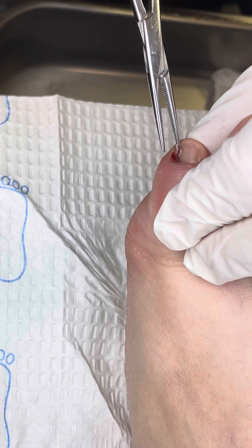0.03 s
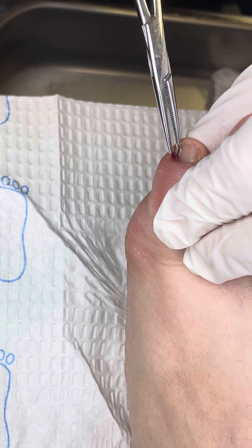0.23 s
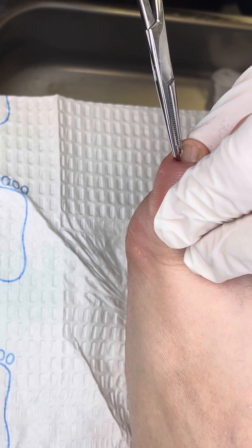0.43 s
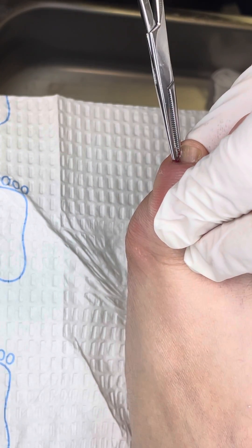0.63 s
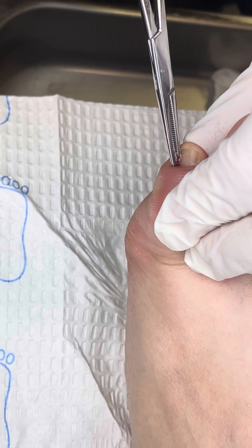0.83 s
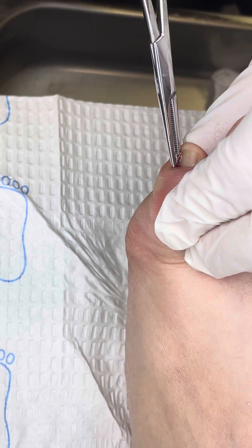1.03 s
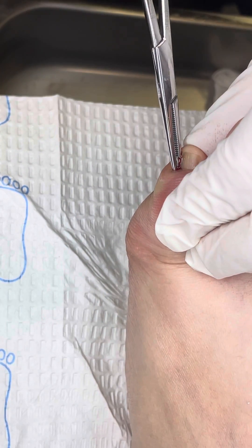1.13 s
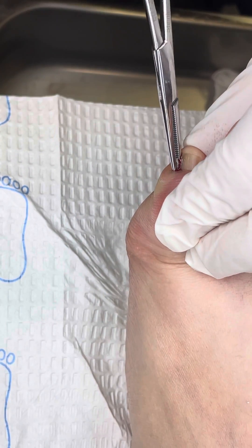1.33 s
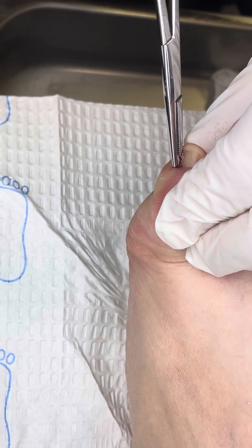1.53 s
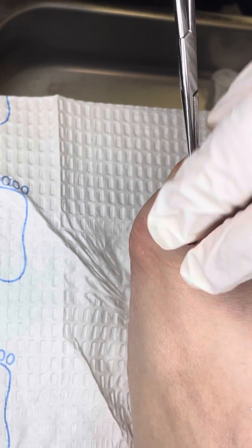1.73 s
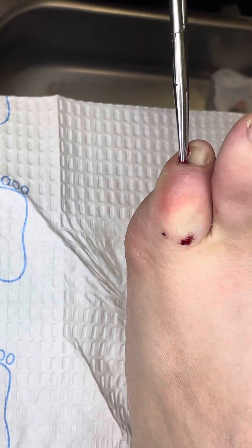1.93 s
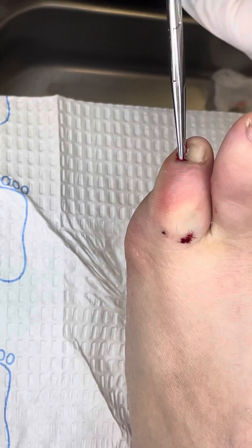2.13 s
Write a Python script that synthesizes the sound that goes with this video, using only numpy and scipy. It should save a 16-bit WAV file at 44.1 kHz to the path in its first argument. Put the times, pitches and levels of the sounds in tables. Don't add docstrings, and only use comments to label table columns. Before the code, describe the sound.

Two crisp metallic clicks of a surgical clamp, then faint latex glove ticks over low ventilation rumble.

```python
import sys
import numpy as np
from scipy import signal
from scipy.fft import rfft, irfft
from scipy.io import wavfile
from scipy.ndimage import uniform_filter1d

SR = 44100
rng = np.random.default_rng(int(sys.argv[2]) if len(sys.argv) > 2 else 0)


def pcm_store(signal):
    levels = np.round(np.clip(np.atleast_2d(signal), -1, 1) * 32767)
    wavfile.write(sys.argv[1], SR, levels.astype(np.int16).T)


def attenuation_scalar(level_db):
    decades = np.asarray(level_db, float) / 20
    return 10 ** decades


N = 96138

# start_s, level_db, tooth_index, rebound_gap_ms
TOOTH_SNAPS = [
    (1.5466, -35.4, 0, .95),
    (1.6069, -35.6, 1, .95),
]
# start_s, level_db, tilt_db_per_octave
RATCHET_CREEP = [
    (1.4640, -78.5, 4.5),
    (1.5037, -82.5, -5),
    (1.5120, -89.5, -9),
    (1.5375, -87, -13),
]
# pitch_hz, swell_ms, first_tooth_db, second_tooth_db
STEEL_MODES = [(850, .35, -7, -3), (1880, .8, 2, 6), (2620, .95, 9.5, 15), (3350, .6, -1, 3),
               (4680, .8, 5, 13), (5200, .6, 2, 8), (6650, .45, -5, 10), (7650, .6, 8, 6), (8500, .3, 5, 5),
               (9650, .3, 10, 9.5), (12150, .5, 6, 11), (13300, .3, 8, 5), (14050, .3, 14, 16.5),
               (15300, .6, -3, 15)]
# delay_in_rebound_gaps, level_db
PAWL_REBOUNDS = [
    (0, 0),
    (1.3, -17),
    (2.6, -23),
    (4.1, -29),
]
# start_s, level_db, pitch_hz, width_hz, length_ms
GLOVE_TICKS = [(.160, -82, 5000, 1500, 2.4), (0.914, -80, 11500, 1190, 6.),
               (1.7278, -46.5, 11300, 7360, 0.88), (1.778, -57, 2720, 600, 3.8),
               (1.793, -63.5, 3040, 795, 6.1), (1.8353, -61.5, 7440, 2500, 3.2),
               (1.836, -61, 2600, 500, 1.54), (1.9312, -55, 4170, 1200, 3), (1.9324, -57, 2680, 700, 2),
               (2.0670, -74, 10900, 5000, 0.87), (2.0790, -66, 623.6, 343, 5.9),
               (1.463, -69.5, 3630, 700, 2.2)]
# time_s, pressure_db
GLOVE_PRESSURE = [(1.462, -105), (1.468, -87.5), (1.54, -79.5), (1.76, -64.5), (1.82, -76.5), (1.89, -69.5),
                  (1.972, -69), (1.982, -92), (2.04, -81.5), (2.13, -79), (2.165, -69)]
# pitch_hz, density_db_per_hz
LATEX_COLOUR = [(700, -7.5), (1500, -5.5), (2800, 3), (4000, -4.5), (6000, -3), (9500, -2.5), (13000, -6),
                (16000, -8)]
# pitch_hz, t60_s
ROOM_DECAY = [(300, 0.12), (1200, 0.49), (2500, 0.3), (5000, 0.35), (9000, 0.34), (15000, .22)]
# pitch_hz, level_db
ROOM_COLOUR = [(400, 12), (1200, 2), (2700, 4), (4800, -1), (6000, -2), (12000, -3), (15500, -7),
               (16000, -30)]
# pitch_hz, likeness_0_to_1
PORT_LIKENESS = [(110, 1), (300, .9), (550, .2), (1200, .2), (2100, .95), (6000, .97), (7000, .998),
                 (16000, .998)]
# pitch_hz, left_over_right_db
LEFT_LEAN = [(90, 0), (200, 1.5), (600, 4), (1100, 2.5), (1800, 3.5), (2600, 0)]
# middle_s, half_length_s, level_db, pitch_hz, width_hz
DRAPE_MOVES = [(0.687, .045, -73, 1670, 1170), (0.71, 0.082, -67, 600, 520), (1.036, 0.099, -54, 150, 195),
               (0.83, 0.13, -60, 166, 187), (0.971, 0.14, -72, 500, 1500)]
# pitch_hz, density_db_per_hz
AIR_COLOUR = [(50, -26.5), (85, -2.5), (97, -1.5), (241, -9.5), (389, -19), (465, -22.5), (524, -23),
              (696, -24), (3000, -52.5), (3900, -73.5), (6600, -120)]
# pitch_hz, density_db_per_hz
HISS_COLOUR = [(800, -8.5), (2000, 6), (3500, -4.5), (7000, -8), (12500, -14.5), (14000, -21)]
# time_s, level_db
DUCT_RUMBLE = [(0.0, -50.5), (0.13, -52), (0.39, -51.5), (0.41, -76), (0.44, -55), (0.65, -60), (0.81, -46),
               (1.2, -56.5), (1.24, -48.5), (1.29, -57), (1.39, -47.5), (1.75, -64), (1.82, -85),
               (1.85, -49.5), (2.0, -51.5), (2.18, -54.5)]
# pitch_hz, width_hz, level_db
DUCT_MODES = [(35.2, 36, -12), (55, 9, -1), (72.5, 12, -7.5)]
# pitch_hz, level_db
MAINS_HUM = [(120, -77.5), (160, -76), (240, -72.5), (360, -74)]
# pitch_hz, lead_radians
PORT_LEAD = [(300, 0), (900, -.55), (1650, -.4), (2600, 1), (4500, .7), (4950, 0), (5550, .3), (6700, 2.4)]


def evened(x):
    return x / np.sqrt(np.mean(x ** 2) + 1e-20)


def read(points, hz):
    f, value = np.transpose(points)
    return np.interp(np.log(hz + 1), np.log(f + 1), value)


def add(mix, start_s, sound):
    part = mix[round(start_s * SR):][:len(sound)]
    part += sound[:len(part)]


def resonate(x, hz, width_hz):
    turn = np.exp(2j * np.pi * hz * np.arange(x.shape[-1]) / SR)
    r = np.exp(-np.pi * width_hz / SR)
    smooth = signal.lfilter([(1 - r) ** 2], [1, -2 * r, r * r], x / turn)
    return 2 * (turn * smooth).real


def coloured(points, patchy_db, channels=2):
    hz = np.fft.rfftfreq(1024, 1 / SR)
    z = rng.standard_normal((N // 256 + 5, 513, 2 * channels + 1)).T
    patches = uniform_filter1d(z[-1], size=10, axis=0)
    patches = evened(uniform_filter1d(patches, size=10, axis=1))
    inside = (hz > .7 * points[0][0])[:, None]
    gain = inside * attenuation_scalar(read(points, hz)[:, None] + patchy_db * patches)
    z = (z[:channels] + 1j * z[channels:-1]) * gain
    return evened(signal.istft(z, nperseg=1024, noverlap=768)[1][:, :N])


def ring(levels_db, gap_ms, blur=1, crack_db=15):
    out, t = np.zeros(2000), np.arange(1200) / SR
    steel = np.array(STEEL_MODES)
    hz, swell_ms = steel[:, 0:1], steel[:, 1:2]
    u = t * 1000 / (swell_ms * blur)
    swell = u * np.exp(1 - u) / swell_ms
    for gaps, db in PAWL_REBOUNDS:
        turns = hz * t + (gaps > 0) * rng.random(hz.shape)
        modes = attenuation_scalar(db + levels_db[:, None]) * swell * np.sin(2 * np.pi * turns)
        add(out, gaps * gap_ms / 1000, modes.sum(0))
    u = t / .0007
    crack = signal.lfilter([1, -.5], 1, rng.standard_normal(1200))
    add(out, 0, attenuation_scalar(crack_db) * crack * np.sqrt(u) * np.exp(-2 * u))
    return out


def clamp():
    direct, walls, steel = np.zeros(N), np.zeros(N), np.array(STEEL_MODES)
    for start_s, db, tooth, gap_ms in TOOTH_SNAPS:
        levels_db = steel[:, 2 + tooth]
        add(direct, start_s, attenuation_scalar(db) * ring(levels_db, gap_ms))
        add(walls, start_s, attenuation_scalar(db) * ring(levels_db, gap_ms, blur=.45, crack_db=21))
    for start_s, db, tilt_db in RATCHET_CREEP:
        levels_db = steel[:, 2] + tilt_db * np.log2(steel[:, 0] / 5000)
        add(direct, start_s, attenuation_scalar(db) * ring(levels_db, gap_ms=.9))
    return direct, walls


def glove():
    t = np.arange(N) / SR
    grain = attenuation_scalar(1.5 * evened(uniform_filter1d(rng.standard_normal(N), size=60)))
    pressure = attenuation_scalar(np.interp(t, *np.transpose(GLOVE_PRESSURE), left=-140))
    out = pressure * grain * coloured(LATEX_COLOUR, patchy_db=0.83, channels=1)[0]
    for start_s, db, hz, width_hz, length_ms in GLOVE_TICKS:
        u = t[:2000] * 1000 / length_ms
        envelope = 2 * np.sqrt(u) * np.exp(-u * 1.07)
        tick = evened(resonate(rng.standard_normal(2000), hz, width_hz))
        add(out, start_s, attenuation_scalar(db) * envelope * tick)
    return out


def diffuse(pair):
    hz, (a, b) = np.fft.rfftfreq(N, 1 / SR), rfft(pair)
    same = np.clip(read(PORT_LIKENESS, hz), 0, 1)
    lean = attenuation_scalar(read(LEFT_LEAN, hz) / 2)
    right = same * a + np.sqrt(1 - same ** 2) * b
    return irfft([a * lean, right / lean], N)


def room(x):
    gap_s = 0.0024
    hz, t, z = signal.stft(rng.standard_normal((2, SR)), SR, nperseg=256)
    decay_db = 60 * t / read(ROOM_DECAY, hz)[:, None]
    z = z * attenuation_scalar(read(ROOM_COLOUR, hz)[:, None] - decay_db)
    onset = np.clip(np.arange(SR) / SR / gap_s - 1, 0, 1)
    tail = signal.istft(z, SR, nperseg=256)[1][:, :SR] * onset
    tail = tail / np.linalg.norm(tail[0])
    return diffuse(signal.fftconvolve(x[None], tail, axes=1)[:, :N])


def drape():
    t, out = np.arange(N) / SR, np.zeros((2, N))
    for middle_s, half_s, db, hz, width_hz in DRAPE_MOVES:
        swell = np.exp(-((t - middle_s) / half_s) ** 2)
        out += attenuation_scalar(db) * swell * evened(resonate(rng.standard_normal((2, N)), hz, width_hz))
    return out


def air_and_hiss():
    air = coloured(AIR_COLOUR + [(6000, -76.5)], patchy_db=0.61)
    return attenuation_scalar(-61) * air + attenuation_scalar(-83.5) * coloured(HISS_COLOUR, patchy_db=.6)


def duct_rumble():
    duct = np.zeros(N)
    for hz, width_hz, db in DUCT_MODES:
        mode = resonate(rng.standard_normal(2 * N), hz, width_hz)[N:]
        duct += attenuation_scalar(db) * evened(mode)
    duct = evened(duct)
    duct = duct / np.sqrt(uniform_filter1d(duct ** 2, size=6000) + 0.11)
    return attenuation_scalar(np.interp(np.arange(N) / SR, *np.transpose(DUCT_RUMBLE))) * duct


def mains_hum():
    t = np.arange(N) / SR
    return sum(attenuation_scalar(db + 0.5) * np.sin(2 * np.pi * (hz * t + rng.random())) for hz, db in MAINS_HUM)


def background():
    return diffuse(drape() + air_and_hiss()) + duct_rumble() + mains_hum()


def scene():
    (direct, walls), hand = clamp(), glove()
    return direct + hand + attenuation_scalar(-11.5) * room(walls + hand) + background()


def band_limit(x):
    return signal.sosfilt(signal.butter(12, 17170, fs=SR, output="sos"), x)


def record(dry):
    edge_hz, lead_per_hz = 15900, .000935
    hz = np.fft.rfftfreq(N, 1 / SR)
    lead = np.interp(hz, *np.transpose(PORT_LEAD))
    lead = lead + lead_per_hz * np.maximum(hz - PORT_LEAD[-1][0], 0)
    ports = np.exp([.5j * lead, -.5j * lead]) / np.sqrt(1 + (hz / edge_hz) ** 120)
    return band_limit(irfft(rfft(dry) * ports, N))


dry = scene()
out = record(dry)
pcm_store(out)
```